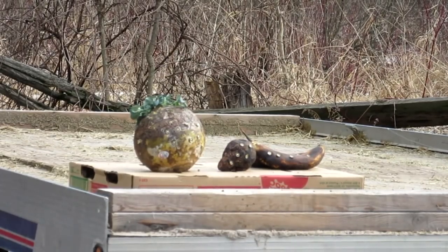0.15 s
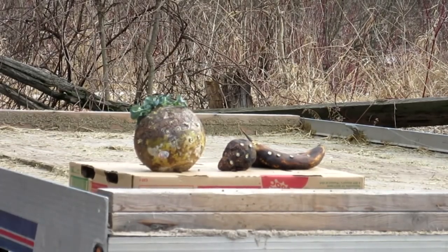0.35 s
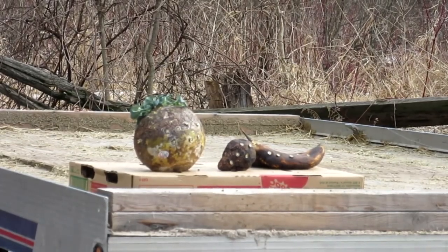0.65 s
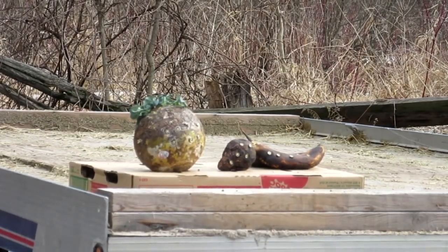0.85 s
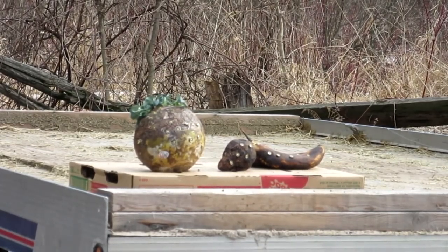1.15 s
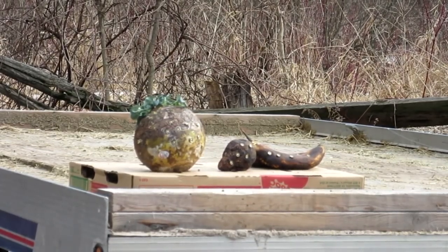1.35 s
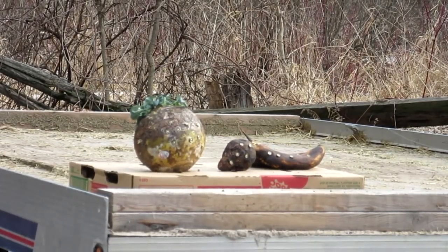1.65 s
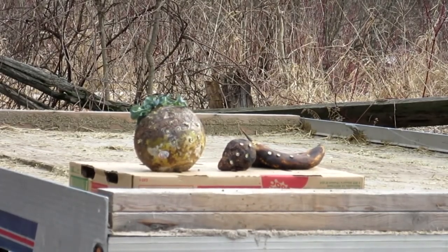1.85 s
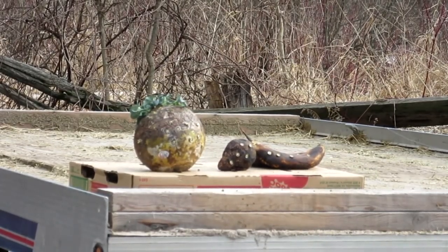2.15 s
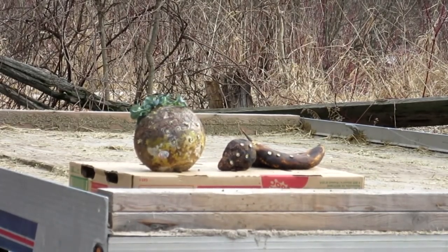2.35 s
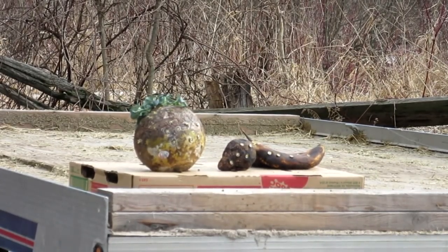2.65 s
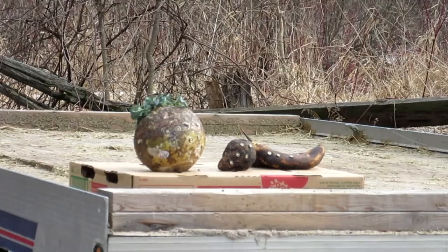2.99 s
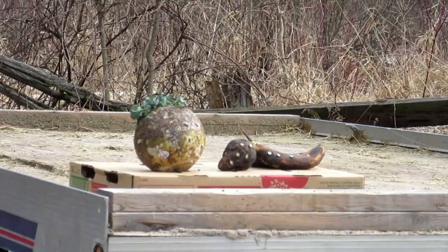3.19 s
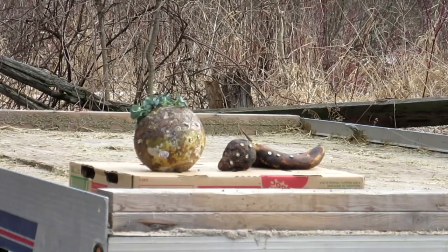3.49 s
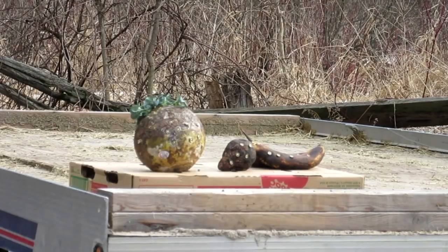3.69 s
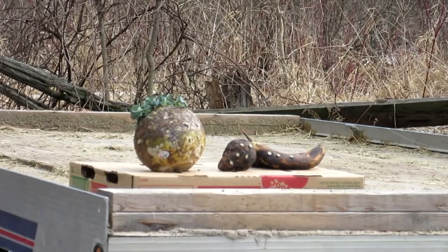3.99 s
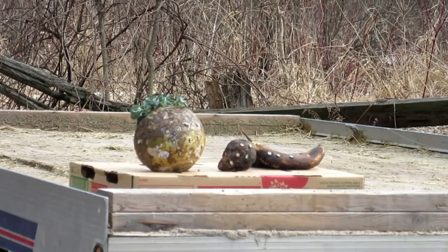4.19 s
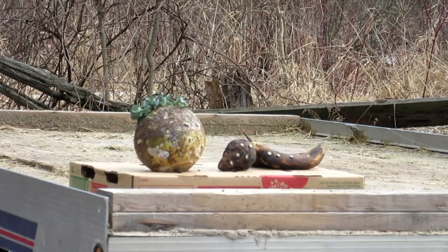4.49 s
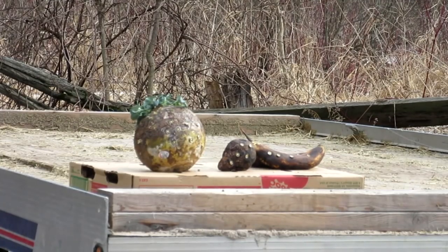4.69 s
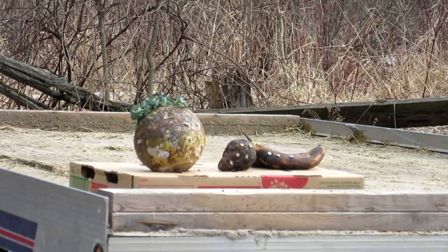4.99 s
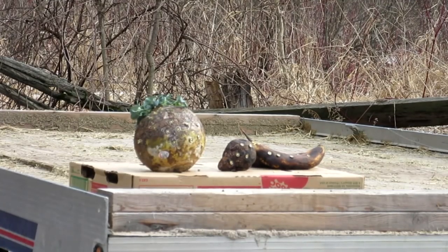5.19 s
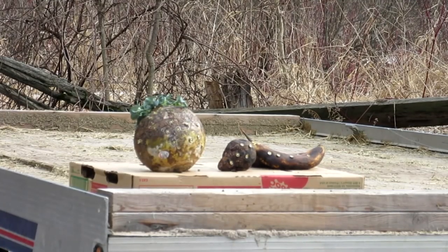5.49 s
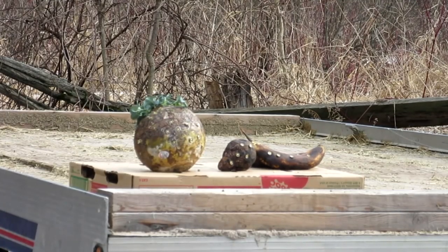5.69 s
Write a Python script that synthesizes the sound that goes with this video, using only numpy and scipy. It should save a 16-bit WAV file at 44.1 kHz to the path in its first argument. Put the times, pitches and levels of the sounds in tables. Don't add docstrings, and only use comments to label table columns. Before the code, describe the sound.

Outdoors in a brushy yard, a gas-driven pellet gun fires close to a small camera microphone. Eleven bright, dry cracks come about a second apart at first, then roughly every 0.4 seconds, growing weaker. Each is followed by a tiny pellet tick and a metallic clack. Low wind thuds and rumble dominate the first two and a half seconds, then fade, over faint distant traffic and hiss.

```python
import sys
import numpy as np
from scipy import signal
from scipy.fft import rfft, irfft
from scipy.io import wavfile
from scipy.ndimage import uniform_filter1d

SR = 44100
rng = np.random.default_rng(int(sys.argv[2]) if len(sys.argv) > 2 else 0)


def output_pcm(signal):
    pcm = np.clip(np.atleast_2d(signal).T, -1, 1) * 32767
    wavfile.write(sys.argv[1], SR, np.round(pcm).astype(np.int16))


def elevation(decibels):
    levels = np.asarray(decibels, float)
    return 10 ** (levels / 20)


N = 257749


def evened(x):
    return x / np.sqrt(np.mean(x ** 2) + 1e-20)


def add(mix, start_s, sound):
    part = mix[round(start_s * SR):][:len(sound)]
    part += sound[:len(part)]


def read(hz, table_hz, value):
    return np.interp(np.log(hz + 1), np.log(np.add(table_hz, 1)), value)


def noise(spectrum, size):
    gain = elevation(read(np.fft.rfftfreq(size, 1 / SR), *np.transpose(spectrum)))
    return evened(irfft(rfft(rng.standard_normal(size)) * gain, size))


def seconds(length):
    return np.arange(round(length * SR)) / SR


# top in seconds, buffeting in dB, rumble in dB, half length in seconds.
GUSTS = [(0.014, -9.5, -14, 0.047), (0.089, -20.5, -28, 0.03), (0.18, -21, -21, .03),
         (0.384, -24, -31.5, 0.072), (0.528, -25.5, -22, 0.026), (0.664, -27, -27.5, 0.094),
         (0.898, -25, -22.5, 0.049), (1.094, -11, -21.5, 0.092), (1.173, -19, -25, 0.12),
         (1.273, -20, -26, 0.051), (1.421, -28.5, -26, 0.058), (1.622, -32, -37.5, 0.065),
         (1.745, -23, -39, 0.079), (1.883, -18, -34, 0.053), (1.94, -23, -29, 0.071),
         (2.025, -21, -28, 0.066), (2.224, -17, -20.5, 0.035), (2.262, -15.5, -28, 0.044),
         (2.335, -10, -19, 0.059), (2.734, -36.5, -36, 0.057), (2.828, -22.5, -37, 0.025),
         (2.95, -30, -36, 0.051), (3.223, -29, -35.5, 0.0364), (3.275, -22.5, -37.5, 0.061),
         (3.482, -35, -31, 0.016), (3.813, -32.5, -40, .04), (4.065, -31, -33.5, 0.063),
         (4.694, -31, -46, 0.045), (5.121, -30, -42.5, 0.027), (5.197, -45.5, -43, 0.034)]


def gusts(t, tops_db, fall_db, lull_db):
    power = elevation(2 * lull_db)
    for (top_s, *_, half_s), top_db in zip(GUSTS, tops_db):
        power = power + elevation(2 * (top_db - fall_db * abs(t - top_s) / half_s))
    return 10 * np.log10(power)


def eddy(db, hz, turn):
    cycles = seconds(3 / hz) * hz - 1.5
    angle = 2 * np.pi * (cycles + turn)
    return elevation(db) * np.sin(angle + 0.26 * np.sin(angle)) * np.exp(-(cycles / .5) ** 2)


# time in seconds, level in dB.
BREEZE = [(0, -33), (.32, -47.5), (.45, -37), (.8, -33), (1.35, -39), (1.52, -44.5), (1.9, -37.5),
          (2.15, -36), (2.55, -50.5), (3.1, -53), (3.62, -44), (3.92, -60), (4.3, -64.5), (4.47, -45),
          (4.83, -60), (5.45, -61), (5.56, -49.5), (5.84, -51.5)]
# frequency in Hz, density in dB per Hz.
RUMBLE = [(8.8, -37.5), (15, -1.5), (70, 0.5), (113, -2), (174, -7), (200, -13.5), (260, -35.5), (400, -74)]
# time in seconds, peak in dB, frequency in Hz.
THUDS = [(0.018, -8, 198), (0.036, -13.5, 241), (0.079, -13, 172), (0.088, -11.5, 190.4),
         (0.184, -16.5, 157), (0.396, -20, 139), (0.629, -24.5, 186.5), (0.884, -12.5, 78.5),
         (1.052, -13, 300), (1.089, -11, 334), (1.103, -14, 444.3), (1.11, -2, 128), (1.18, -11.5, 218),
         (1.232, -17, 171), (1.248, -16, 197), (1.305, -15, 183.7), (1.412, -17.5, 106),
         (1.621, -21, 192.6), (1.763, -19.5, 258.8), (2.007, -18, 95), (2.04, -18, 156), (2.22, -10, 191.4),
         (2.32, -9, 345), (2.34, -10.5, 376), (2.347, -10, 201.7), (2.829, -21.5, 126),
         (2.948, -21.5, 148.5), (3.259, -21, 217.5), (3.278, -15, 168), (4.689, -34.5, 300)]


def wind():
    t = np.arange(N) / SR
    lull_db = np.interp(t, *np.transpose(BREEZE))
    _, buffet_tops, rumble_tops, _ = np.transpose(GUSTS)
    buffet_db = gusts(t, buffet_tops, 15, lull_db - 9.5)
    rumble_db = gusts(t, rumble_tops, 12.5, lull_db - 1)
    out = elevation(rumble_db) * noise(RUMBLE, N)
    for when, size, pace, turn in rng.random((1300, 4)):
        db = buffet_db[int(when * N)]
        hz = 150 * elevation(0.23 * (db + 28.5) + 11 * (pace - 0.29))
        eddy_db = db - 8.0 - 4.663 * np.log(size + 0.031) - 6.4 * pace
        add(out, when * t[-1], eddy(eddy_db, hz, turn))
    for (when, db, hz), turn in zip(THUDS, rng.random(len(THUDS))):
        add(out, max(when - 1.5 / hz, 0), eddy(db, hz, turn))
    return out


# time in seconds, gain in dB.
GAIN = [(0, -1), (.25, 0), (.5, -7.5), (1.45, -3), (1.7, -9.5), (2.4, -8.5), (2.7, -12.5), (3.3, -13),
        (4, -17.5), (5, -18), (5.84, -16)]


def camera_db():
    return np.interp(np.arange(N) / SR, *np.transpose(GAIN))


# frequency in Hz, density in dB per Hz.
TRAFFIC = [(100, -25.5), (300, -7.5), (700, -7), (1060, -8.5), (1600, -14), (2600, -24.5), (4000, -41.5),
           (6000, -59)]
# frequency in Hz, density in dB per Hz.
HISS = [(1000, -6), (3400, 1), (5500, -1.5), (7200, -0.5), (10000, -6.5), (14800, -7), (16000, -16.5)]


def air():
    swell = evened(uniform_filter1d(rng.standard_normal(N), 3000))
    gain_db = camera_db()
    traffic = elevation(-45 + gain_db + 0.48 * swell) * noise(TRAFFIC, N)
    hiss = elevation(-62.5 + 0.88 * gain_db) * noise(HISS, N)
    return traffic + hiss


def tick(db, hz, length):
    t = seconds(0.09)
    puff = noise([(hz / 6, -9), (hz / 2, -2.5), (hz, 0), (hz * 1.84, -10), (hz * 4, -30)], len(t))
    return elevation(db - 7.5) * puff * np.minimum(t / 0.00021, 1) * np.exp(-t / length)


# start in seconds, peak in dB, frequency in Hz, length in seconds.
TICKS = [(0.072, -34.5, 2570, 0.003), (0.1295, -30, 2450, 0.0092), (0.2048, -34, 2540, 0.0055),
         (0.712, -36.5, 3460, 0.004), (3.147, -46, 2860, 0.003), (3.198, -48.5, 2630, 0.00334),
         (3.228, -46, 2700, 0.0029), (3.616, -53, 2990, 0.00468), (3.854, -50, 7340, 0.0033),
         (4.267, -44.5, 5000, 0.0024), (4.632, -58, 4690, 0.0029), (5, -51, 7210, 0.0025),
         (5.3928, -54, 2800, 0.003), (5.7006, -37, 6210, 0.0021), (5.777, -62.5, 2670, 0.003)]


def ticks(mix):
    for start_s, *row in TICKS:
        add(mix, start_s, tick(*row))


# frequency in Hz, bandwidth in Hz, level in dB.
SNAP_RING = [(6370, 1500, 0), (10100, 2900, 3), (13440, 9000, -13), (2270, 707, -8)]


def snap():
    t = seconds(.003)
    out = np.zeros(len(t))
    for hz, width_hz, db in SNAP_RING:
        out += elevation(db) * np.exp(-np.pi * width_hz * t) * np.cos(2 * np.pi * hz * t)
    return out / out[0]


# frequency in Hz, level in dB, quick t60 in seconds, slow part in dB,
# slow t60 in seconds.
YARD = [(300, 2.5, 0.053, -17, .4), (842, 1.5, 0.1, -20, 0.13), (1660, -2, 0.11, -17.5, 0.48),
        (3036, -3.5, 0.04, -12.5, 0.34), (5770, 6, 0.051, -28, 0.48), (9300, 7.5, 0.044, -21, 0.27),
        (14200, -15.5, 0.15, -17, 0.35)]


def tail(length):
    hz, t, z = signal.stft(rng.standard_normal(round(length * SR)), SR, nperseg=128)
    table_hz, *columns = np.transpose(YARD)
    db, quick_s, slow_db, slow_s = (read(hz, table_hz, column)[:, None] for column in columns)
    patches = uniform_filter1d(rng.standard_normal(z.shape), size=5, axis=0)
    patches_db = 2.2 * evened(uniform_filter1d(patches, size=4, axis=1))
    early = elevation(-60 * t / quick_s + patches_db)
    late = elevation(slow_db - 60 * t / slow_s + patches_db)
    out = signal.istft(z * elevation(db) * (early + late), SR, nperseg=128)[1]
    return out * np.minimum(np.arange(len(out)) / SR / .005, 1)


# frequency in Hz, level in dB, t60 in seconds.
ACTION = [(1690, -5, .035), (2020, -4, .035), (2830, -3, .045), (3770, -11, .03), (4750, -11, .035),
          (6220, 0, .05), (7350, -6, .03), (8400, -10, .035), (8900, -8, .04), (10350, -8, .035),
          (10680, -8, .04), (11900, -12, .03)]


def ring(t, thin_db, deep_db, stretch=1):
    out = np.zeros(len(t))
    for (hz, db, t60), (tune, blow, turn) in zip(ACTION, rng.standard_normal((len(ACTION), 3))):
        level_db = db + (thin_db if hz > 4200 else deep_db) + 2.5 * blow
        decay = elevation(level_db - 60 * t / (t60 * stretch))
        out += decay * np.sin(2 * np.pi * (hz * (1 + .004 * tune) * t + turn))
    return out * np.minimum(t / 0.0013, 1)


def gas_push(push_db, barrel_db):
    t = seconds(.006)
    u = t / .0004
    push = elevation(push_db) * np.sin(np.pi * u / 2) * np.exp(-(u / 3.2) ** 2) * np.minimum(u / .25, 1)
    return push + elevation(barrel_db - 60 * t / 0.0052) * np.sin(2 * np.pi * 1940 * t)


SNAP_MS = [.05, .3, .85, 1.1, 1.32, 1.6]
SNAP_DB = [-14.5, -2.5, 13, 0, -13.5, -26.5]


def valve_snaps(rebound_ms, push_db, rebound_db):
    out = np.zeros(400)
    levels_db = np.append(SNAP_DB, rebound_db) + 1.2 * rng.standard_normal(len(SNAP_MS) + 1)
    for ms, snap_db in zip(np.append(SNAP_MS, rebound_ms), levels_db):
        leading_db = push_db + 7.0 if ms < .5 else 0
        add(out, ms / 1000, elevation(snap_db + leading_db) * snap())
    return out


# delays in ms, the second from the ground.
ECHO_MS = [0, 3.5, 8.2, 12, 36, 54.8, 58.3, 112]
ECHO_TREBLE_DB = [2, -4, -21.5, -20.5, -44, -41, -44, -48]
ECHO_BASS_DB = [1, -7, -18, -27, -21.5, -32, -56.5, -29]


def shot(rebound_ms, db, push_db, rebound_db, tail_db, ground_db, barrel_db):
    push = gas_push(push_db, barrel_db)
    snaps = valve_snaps(rebound_ms, push_db, rebound_db)
    t = seconds(.002)
    smeared = np.convolve(snaps, .3 * np.exp(-t / .00025) * np.cos(2 * np.pi * 9600 * t))
    out = elevation(tail_db) * tail(.6)
    add(out, .0548, elevation(tail_db - 27.0) * tail(.3))
    add(out, .001, ring(seconds(.1), -27.0, -32.5))
    for ms, treble_db, bass_db in zip(ECHO_MS, ECHO_TREBLE_DB, ECHO_BASS_DB):
        echo = elevation(treble_db) * (smeared if ms else snaps)
        add(echo, 0, elevation(bass_db) * push)
        add(out, ms / 1000, echo * elevation(ground_db if ms == ECHO_MS[1] else 0))
    return elevation(db - 2.0) * signal.lfilter(*signal.butter(2, 96, "high", fs=SR), out)


SHOT_S = [.2566, 1.4865, 2.449, 3.0052, 3.3969, 3.7425, 4.125, 4.5075, 4.8778, 5.2629, 5.6457]
# snap peak in dB, gas push in dB, rebound snap in dB, barrel ring in dB.
SHOTS = [(3.5, -2, 8, -15.5), (3.5, -4, 2.5, -14.5), (0.5, -4.5, -2.5, -14), (-2.5, -6, 3.5, -20.5),
         (-4.5, -4, 9, -19), (-6, -6.5, -6.5, -15), (-8, -6, -20, -23), (-7, -6, -17, -10.5),
         (-10, -3.5, -14, -15.5), (-10.5, -2.5, -23, -17), (-9, -4, -22.5, -2)]


def shots(mix):
    for k, (start_s, (snap_db, push_db, rebound_db, barrel_db)) in enumerate(zip(SHOT_S, SHOTS)):
        rebound_ms = np.clip(3.25 - .07 * (5 - k), 3, 3.25)
        tail_db, ground_db = -15 - 0.56 * snap_db, -2.5 - 0.65 * snap_db
        add(mix, start_s, shot(rebound_ms, snap_db, push_db, rebound_db, tail_db, ground_db, barrel_db))


# frequency in Hz, density in dB per Hz.
PELLET = [(800, -22.5), (2500, -9), (6200, 1.5), (8000, -4.5), (11000, -0.5), (15000, -8)]


def pellet(db):
    t = seconds(.008)
    return elevation(db + 2.5) * noise(PELLET, len(t)) * np.minimum(t / .0002, 1) * np.exp(-t / .0009)


PELLET_S = [.275, 1.5024, 2.4685, 2.473, 2.4853, 3.0248, 3.0281, 3.0424, 3.4192, 3.4224, 3.4351, 3.7645,
            3.7677, 3.7824, 4.1461, 4.1495, 4.1646, 4.5278, 4.5307, 4.5489, 4.8992, 4.9181, 5.304, 5.6619,
            5.6925]
PELLET_DB = [-18, -20, -22, -25, -27, -24, -27, -27.5, -22.5, -29, -29, -33.5, -27.5, -31.5, -18, -29.5,
             -43, -23.5, -23, -30, -28, -31, -29, -19.5, -29]


def pellets(mix):
    for start_s, db in zip(PELLET_S, PELLET_DB):
        add(mix, start_s, pellet(db))


# frequency in Hz, density in dB per Hz.
RATTLE = [(700, -15), (1900, -6.5), (2800, -17), (4000, -12.5), (6200, -0.5), (8000, -11), (10900, -11.5),
          (15500, -20.5)]


def clack(db, thin_db, deep_db, length):
    t = seconds(.08)
    rattle = np.minimum(t / 0.000737, 1) * np.exp(-t / 0.0086) * noise(RATTLE, len(t))
    rest = elevation(-700 * np.maximum(t - length, 0))
    struck = (rattle + elevation(5.5) * ring(t, thin_db, deep_db)) * rest
    out = elevation(-5.0) * tail(0.45)
    add(out, 0, struck)
    add(out, 0, elevation(-27) * ring(seconds(.25), thin_db, deep_db, stretch=5))
    return elevation(db - 9.0) * out


# start in seconds, peak in dB, thin ring in dB, deep ring in dB,
# rattle length in seconds.
CLACKS = [(0.3434, -15.5, 0, -3.5, 0.029), (1.5845, -16.5, -1.5, -2.5, 0.0061),
          (2.5465, -18, -4, -2, 0.015), (3.0794, -21, -4, -2.5, 0.033), (3.472, -21, -1.5, -1.5, 0.011),
          (3.8126, -22.5, -0.5, -2, 0.014), (4.1939, -23, -4, -5, 0.0064), (4.5762, -23.5, 0, -2.5, 0.014),
          (4.945, -24, 0.5, -6, 0.011), (5.3316, -23.5, -1, -3.5, 0.025), (5.7016, -20, -2.5, -3.5, 0.017)]


def clacks(mix):
    for start_s, *row in CLACKS:
        add(mix, start_s, clack(*row))


def scene():
    since = np.arange(N) / SR - np.array(SHOT_S)[:, None]
    ducked = ((since > 0) * np.exp(-(since / .09) ** 4)).sum(0)
    mix = wind() * elevation(-7.5 * ducked) + air()
    for source in (shots, pellets, clacks, ticks):
        source(mix)
    return mix[None]


# frequency in Hz, threshold in dB per bin.
HEARD = [(6000, -130), (10000, -118), (12000, -112), (14000, -104), (15500, -96)]


def audible(sound):
    hz, _, z = signal.stft(sound, SR, nperseg=2048)
    band_db = 10 * np.log10(abs(uniform_filter1d(abs(z) ** 2, size=32, axis=1)) + 1e-20)
    kept = np.clip((band_db - read(hz, *np.transpose(HEARD))[:, None]) / 2, 0, 1)
    return signal.istft(z * kept, SR, nperseg=2048)[1][:, :N]


def roll_off(x):
    return signal.sosfilt(signal.butter(12, 16440, fs=SR, output="sos"), x)


def record(dry):
    top = signal.firwin(121, 14850, window=("kaiser", 7), fs=SR)
    soft = signal.oaconvolve(np.clip(dry, -1.05, 1.05), top[None], "same")
    return roll_off(np.clip(audible(soft), -1, 1))


dry = scene()
out = record(dry)
output_pcm(out)
```